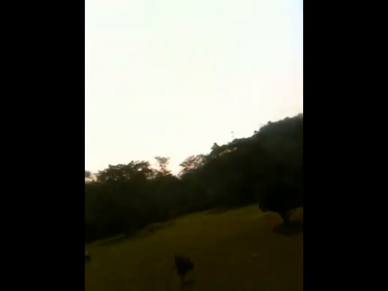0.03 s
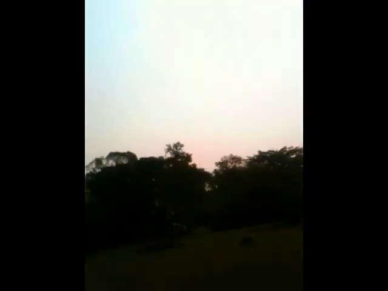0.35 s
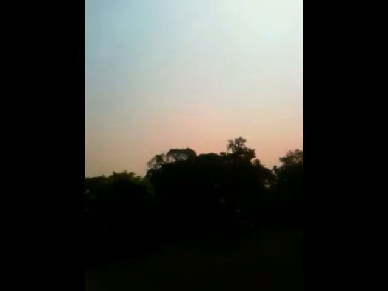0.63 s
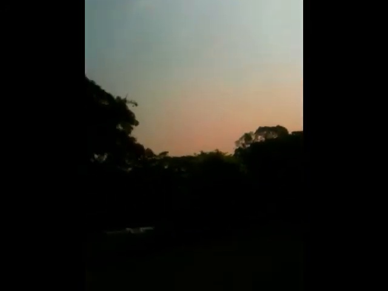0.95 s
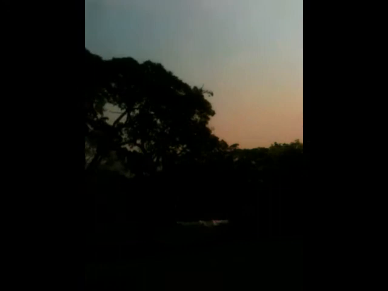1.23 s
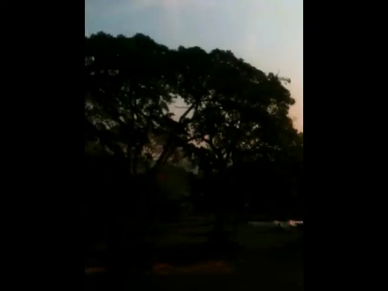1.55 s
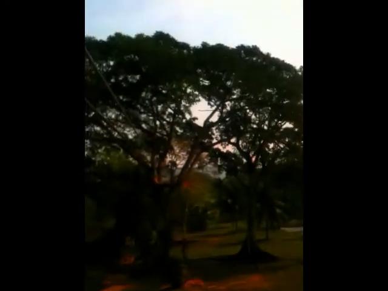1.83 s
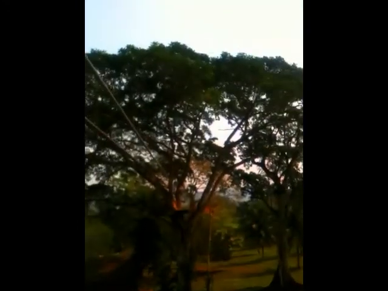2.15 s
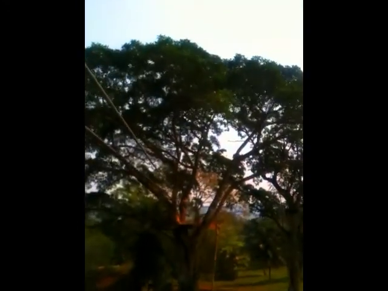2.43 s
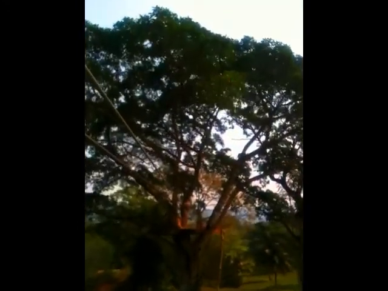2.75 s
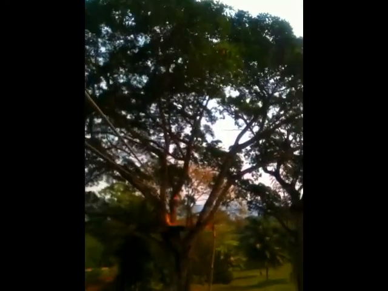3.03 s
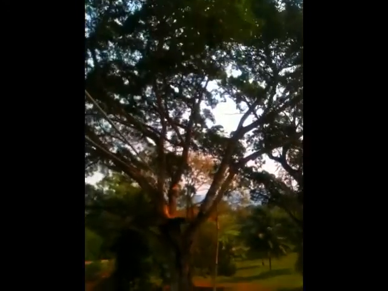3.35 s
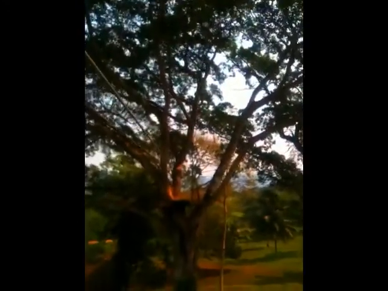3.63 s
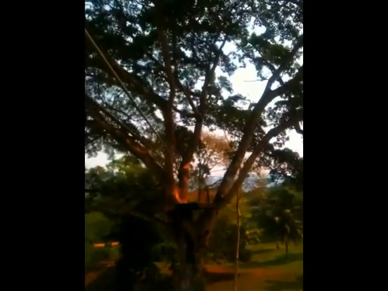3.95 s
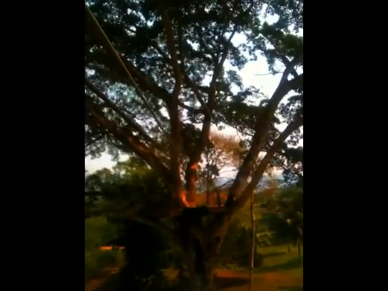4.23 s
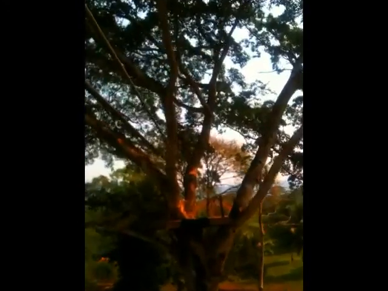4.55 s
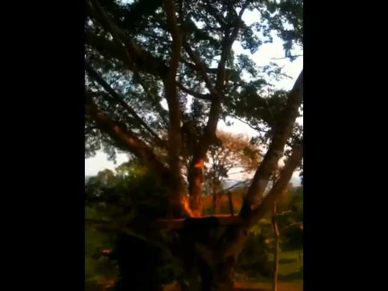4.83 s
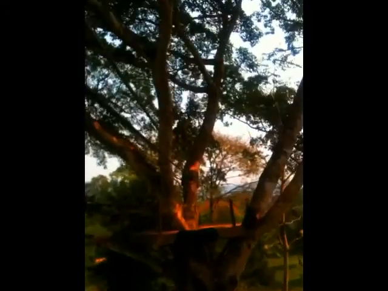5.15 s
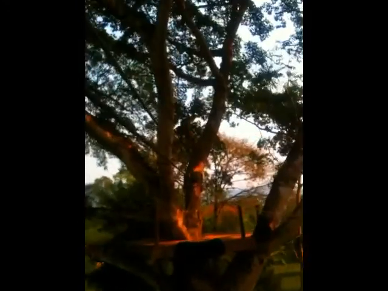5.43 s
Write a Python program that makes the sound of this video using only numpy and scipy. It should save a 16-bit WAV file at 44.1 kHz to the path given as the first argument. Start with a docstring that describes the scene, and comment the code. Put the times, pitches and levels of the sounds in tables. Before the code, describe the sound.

Close to the microphone, pulley wheels hiss and ring on a steel zip-line cable in the open air. At first, rumbling wind and a few hard, distorted buffets choke the hiss. Once the gusts ease, the high hiss comes through with a slight flutter and brief metallic swells over a steady low cable drone. It gradually fades while a thin whine sinks in pitch as the ride slows.

```python
"""Gusts and a bright metallic hiss hit a microphone riding close to a zip-line trolley.
The sheaves hiss and ring on the steel cable, surging where a flange rubs; the twisted strands add
a faint whine over a low drone. Early on, wind and hiss together overload the microphone.
Then the wind drops, the hiss fades and the whine falls as the trolley slows toward a tree platform."""
import sys
import numpy as np
from scipy import signal
from scipy.fft import rfft, irfft
from scipy.io import wavfile

SR = 44100
rng = np.random.default_rng(int(sys.argv[2]) if len(sys.argv) > 2 else 0)


def dump(signal):
    """Clip the signal to [-1, 1] and save it as 16-bit WAV at the path in sys.argv[1]."""
    limited = np.clip(np.atleast_2d(signal).T, -1, 1)
    pcm = np.round(limited * 32767).astype(np.int16)
    wavfile.write(sys.argv[1], SR, pcm)


N = 246078
TIME = np.arange(N) / SR
BIN_HZ = np.arange(N // 2 + 1) * SR / N
CLIMB_S = np.maximum(TIME - 2.5, 0)   # time spent on the rising end of the sagging cable


def from_db(db):
    """Decibels to gain."""
    return 10 ** (np.asarray(db) / 20)


def unit_power(x):
    """Scale to an RMS of 1."""
    return x / np.sqrt(np.mean(x ** 2) + 1e-20)


def in_time(rows):
    """One control for each column after the time, joined by straight lines."""
    times, *columns = np.transpose(rows)
    return [np.interp(TIME, times, column) for column in columns]


def drift(rate_hz):
    """Random wander of unit power, mostly slower than rate_hz."""
    return unit_power(irfft(rfft(rng.standard_normal(N)) / (1 + (BIN_HZ / rate_hz) ** 2), N))


def coloured_noise(spectrum):
    """Steady noise of unit power, shaped by rows of Hz and relative dB."""
    hz, level_db = np.transpose(spectrum)
    shape_db = np.interp(np.log(np.maximum(BIN_HZ, 1)), np.log(hz), level_db)
    return unit_power(irfft(rfft(rng.standard_normal(N)) * from_db(shape_db), N))


def resonance(x, hz, width_hz):
    """Two-pole resonance with a peak gain of 1."""
    radius = np.exp(-np.pi * width_hz / SR)
    poles = [1, -2 * radius * np.cos(2 * np.pi * hz / SR), radius ** 2]
    return signal.lfilter(np.array([1, 0, -1]) * (1 - radius ** 2) / 2, poles, x)


def tilted(x, db_per_octave, pivot_hz):
    """Lean the spectrum over two octaves each side of a pivot, by bands with moving gains."""
    octave = np.clip(np.log2(np.maximum(BIN_HZ, 1) / pivot_hz), -2, 2)
    spectrum = rfft(x)
    return sum(irfft(spectrum * np.maximum(1 - np.abs(octave - k), 0), N) * from_db(k * db_per_octave)
               for k in range(-2, 3))


def cable_drone(level_db=-34.5):
    """The taut cable and the hanger drone low and steady."""
    # Each row: frequency in Hz, relative level in dB.
    drone_spectrum = [(25, -36), (80, -40), (115, -7), (160, 3.5), (210, 5.5), (290, 1), (420, -3),
                      (600, -20), (1200, -34)]
    return from_db(level_db) * coloured_noise(drone_spectrum)


def strand_whine(speed, hiss_db, full_speed_hz=1068, level_db=-42, jitter=0.00553, waver_db=7.0):
    """Strands passing under the sheaves make a thin, unsteady whine that fades with the hiss."""
    # Each row: multiple of the strand rate, relative level in dB.
    partials = [(.452, -6.5), (1, 1.5), (1.49, -0.5), (2.19, 4), (2.86, -10), (4.37, 0)]
    strand_hz = full_speed_hz * speed * (1 + jitter * drift(49))
    phase = 2 * np.pi * np.cumsum(strand_hz) / SR
    whine = sum(np.sin(multiple * phase) * from_db(db + waver_db * drift(6.7))
                for multiple, db in partials)
    return np.sqrt(2) * whine * from_db(level_db + hiss_db)


def airflow(side_on_db=-16.5, sheltered_db=-26, fade_db_per_s=-8.5):
    """Wind strength at the microphone: a stream that dies on the climb, with gusts on top."""
    # Each row: start in seconds, length in seconds, peak in dB.
    gusts = [(.0, 0.085, -15.5), (0.143, 0.11, -21), (.29, 0.097, -12.5), (0.468, 0.92, -4.2)]
    shelter = np.clip((TIME - 1.4) / 0.27, 0, 1)   # facing forward, the rider shields the microphone
    stream_db = side_on_db + (sheltered_db - side_on_db) * shelter + fade_db_per_s * CLIMB_S
    power = from_db(stream_db) ** 2
    for start, length, peak_db in gusts:
        progress = np.clip((TIME - start) / length, 0, 1)
        arch = np.abs(np.sin(np.pi * progress)) ** 0.55   # flattened on top
        power += (from_db(peak_db) * arch) ** 2
    return np.sqrt(power)


def wind_rumble(lumpy_db=2.1):
    """Lumpy turbulence rumbles right at the microphone port."""
    # Each row: frequency in Hz, relative level in dB.
    turbulence_spectrum = [(25, -36), (60, -29), (105, -5.5), (170, -0.5), (330, -0.5), (600, -7),
                           (1000, -13.5), (1700, -18), (3500, -23.5)]
    return coloured_noise(turbulence_spectrum) * airflow() * from_db(lumpy_db * drift(23))


def wind_buffets(ragged_db=0.6, rebound_spread=2.46):
    """Big eddies strike the port, pushing the diaphragm and letting it rebound."""
    # Each row: centre in seconds, half length in seconds, signed peak pressure, rebound from 0 to 1.
    eddies = [(.699, 0.0043, 2, 0.33), (0.712, .003, 1.5, 0), (0.865, 0.0026, 2, 0.4),
              (.956, 0.0026, 1.9, 0.6), (1.034, 0.003, -2, 0.56), (1.199, 0.0061, 2.5, 0.33),
              (1.211, 0.0026, 2, 0.6), (1.268, 0.016, -3, 0.05), (1.315, 0.0058, 3, 0.88)]
    pressure = np.zeros(N)
    for centre, half, peak, rebound in eddies:
        # a steep-sided core inside a wider halo of opposite pressure
        offset = (TIME - centre) / half
        core = np.exp(-offset ** 4)
        halo = np.exp(-(offset / rebound_spread) ** 4)
        pressure += peak * ((1 + rebound) * core - rebound * halo)
    return pressure * from_db(ragged_db * drift(67))


def flange_rub_db(mode_hz, reach_hz=260):
    """A flange rubs the cable, and a mode surges if it lies near the excited frequency."""
    # Each row: peak time in seconds, half length in seconds, rise in dB, excited frequency in Hz.
    rubs = [(1.467, 0.067, 4, 2455), (2.03, 0.046, 4, 2455), (2.26, .05, 5, 2455), (2.42, 0.22, 2.5, 3820),
            (2.79, 0.043, 7.5, 2455), (2.97, 0.11, 4.5, 3630), (3.222, .07, 4, 2455),
            (3.7, 0.43, 4.5, 5463), (3.82, 0.21, 4, 4300), (5.26, .06, 4.5, 4230)]
    return sum(rise_db * np.exp(-((TIME - centre) / half) ** 2 - ((mode_hz - hz) / reach_hz) ** 2)
               for centre, half, rise_db, hz in rubs)


def trolley_shiver(speed, full_speed_hz=17.8):
    """The trolley shivers on the cable, more slowly as it loses speed."""
    shiver_hz = full_speed_hz * speed * (1 + 0.028 * drift(4.9))
    return np.sin(2 * np.pi * np.cumsum(shiver_hz) / SR)


def sheaves(speed, hiss_db, tilt, ringing_db, flutter_db=1.04, shiver_db=0.95, waver_db=1.65):
    """Countless wire contacts merge into a hiss and keep the sheaves and side plates ringing."""
    # Each row: frequency in Hz, relative level in dB.
    hiss_spectrum = [(80, -72), (1100, -24), (2050, -11.5), (2330, -4.5), (2850, -4.5), (3300, -4.5),
                     (4300, -5), (4800, -6), (6100, -1.5), (6600, 0.95), (8500, -1), (11200, -2.5),
                     (12500, -6), (14400, -12.5)]
    # Each row: frequency in Hz, width in Hz, level against the hiss in dB, factor on the bite.
    metal_modes = [(1727, 170, -29, 0.46), (2450, 273, -16, 0.26), (2803, 310, -18, 0.044),
                   (3290, 190, -24.5, 1.5), (3823, 294, -12, 0.51), (4221, 300, -14.5, -0.21),
                   (4413, 210, -22, -0.21), (5463, 460, -20, -1.05), (6475, 340, -19.5, 0.19),
                   (6870, 100, -25, 0.52), (8370, 320, -23, .3), (9650, 250, -15, 0.13),
                   (10840, 350, -28, -.2), (11520, 550, -27, -1), (13160, 740, -21.5, 1.1)]
    # How hard the cable bites on the flanges. Each row: time in seconds, bite in dB.
    flange_bite = [(0, -3), (.66, 4), (1.8, -2.5), (3.42, 5), (3.85, -4.5), (5.58, -3.5)]
    bite_db, = in_time(flange_bite)
    sound = tilted(coloured_noise(hiss_spectrum), tilt, pivot_hz=6900)
    for hz, width, level_db, bite_factor in metal_modes:
        ring = unit_power(resonance(resonance(rng.standard_normal(N), hz, width), hz, width))
        surge_db = bite_factor * bite_db + flange_rub_db(hz) + waver_db * drift(17)
        sound += ring * from_db(level_db + ringing_db + surge_db)
    return sound * from_db(hiss_db + flutter_db * drift(25) + shiver_db * trolley_shiver(speed))


def scene(braking_per_s2=0.0308):
    """One microphone travels with the rider and feeds both channels alike."""
    # The rider swings round to face forward, turning the microphone past the trolley.
    # Each row: time in seconds, hiss in dB, tilt in dB per octave, ringing in dB.
    rider_swing = [(0, -3, -1.5, -6), (.33, -1, 3.5, -1.5), (.72, -11.5, 4, 4.5), (1.08, -9.5, 0.4, -2),
                   (1.4, -3, 0.5, 2), (1.8, -3, -1.7, .5)]
    swing_db, swing_tilt, swing_ringing_db = in_time(rider_swing)
    # the steepening climb brakes the trolley, and its sound grows softer and duller
    speed = 1 - braking_per_s2 * CLIMB_S ** 2   # share of full speed
    hiss_db = swing_db - 2.5 * CLIMB_S
    tilt = swing_tilt - 0.35 * CLIMB_S
    ringing_db = swing_ringing_db - 0.15 * CLIMB_S
    sound = sheaves(speed, hiss_db, tilt, ringing_db)
    sound += strand_whine(speed, hiss_db) + cable_drone()
    sound += wind_rumble() + wind_buffets()
    return np.array([sound, sound])


def record(dry, ceiling=0.69, hardness=2.84, cutoff_hz=15750):
    """The input stage saturates, so each big eddy chokes the hiss; a steep low-pass follows."""
    drive = signal.resample_poly(dry, 2, 1, axis=1) / ceiling   # oversampled against aliasing
    saturated = ceiling * drive / (1 + np.abs(drive) ** hardness) ** (1 / hardness)
    low_pass = signal.ellip(12, 0.1, 70, cutoff_hz, fs=SR, output="sos")
    return signal.sosfilt(low_pass, signal.resample_poly(saturated, 1, 2, axis=1))


dry = scene()
out = record(dry)
dump(out)
```